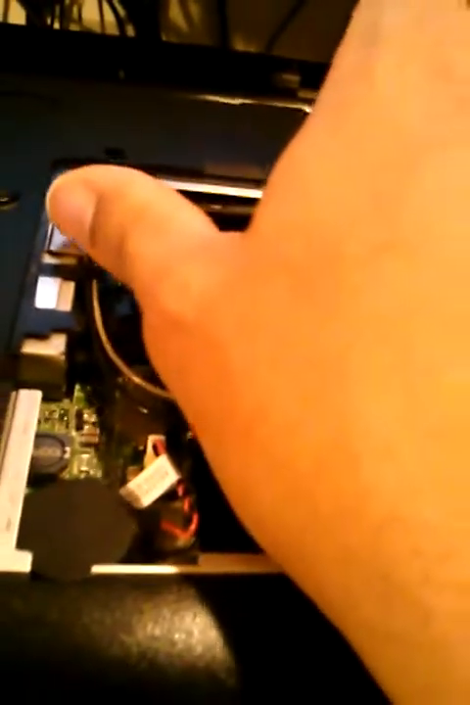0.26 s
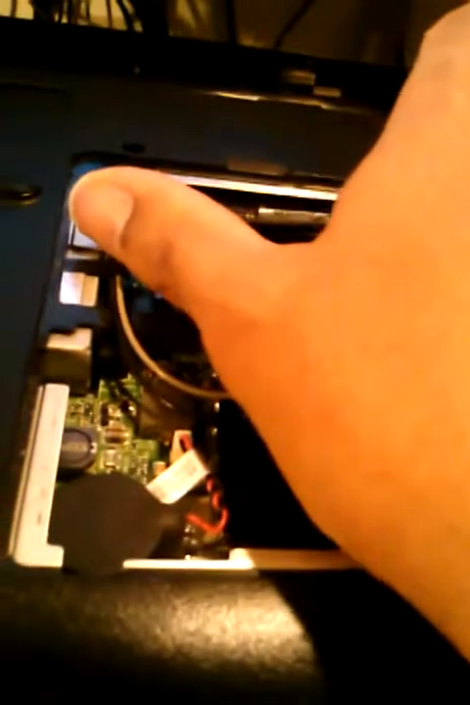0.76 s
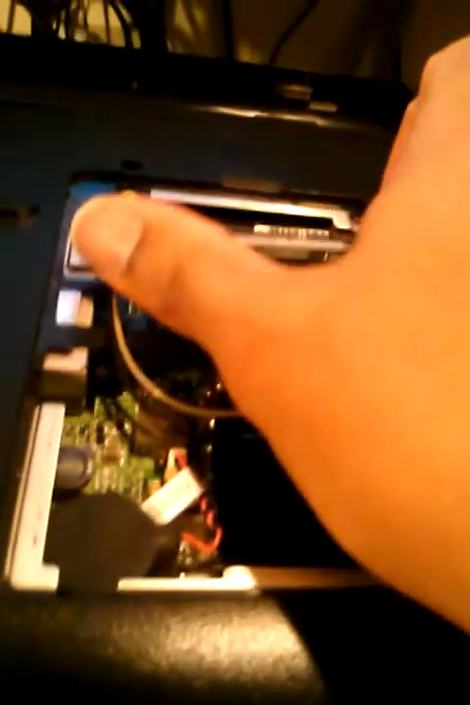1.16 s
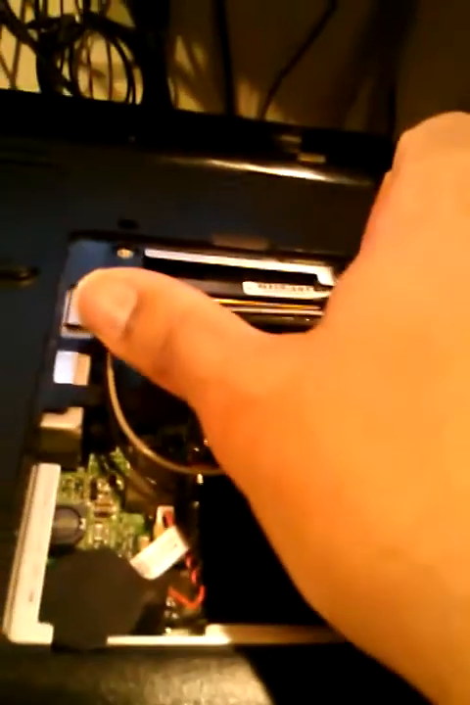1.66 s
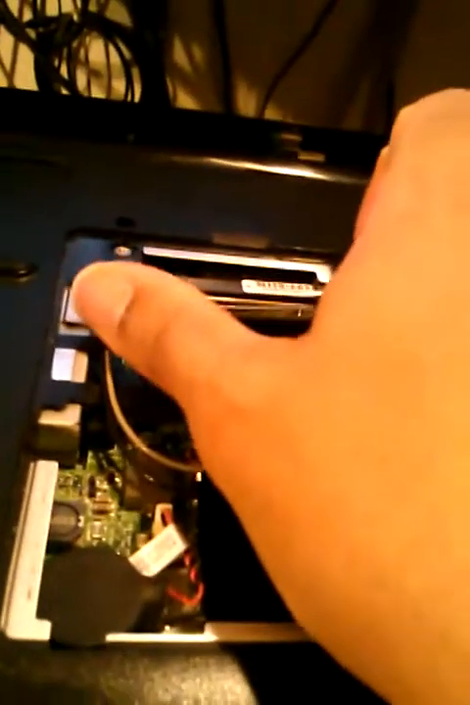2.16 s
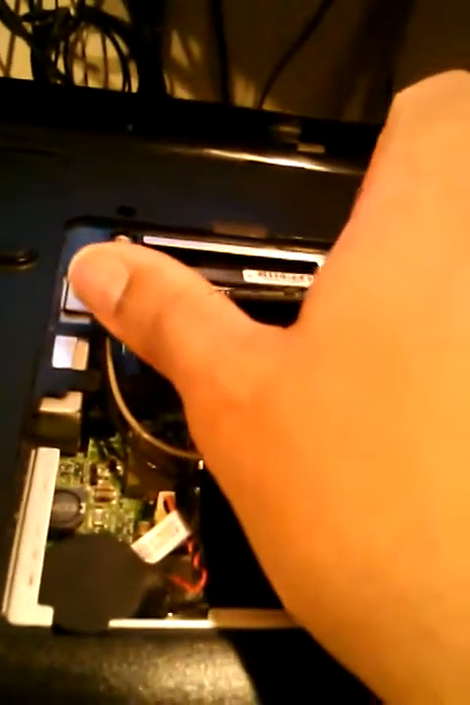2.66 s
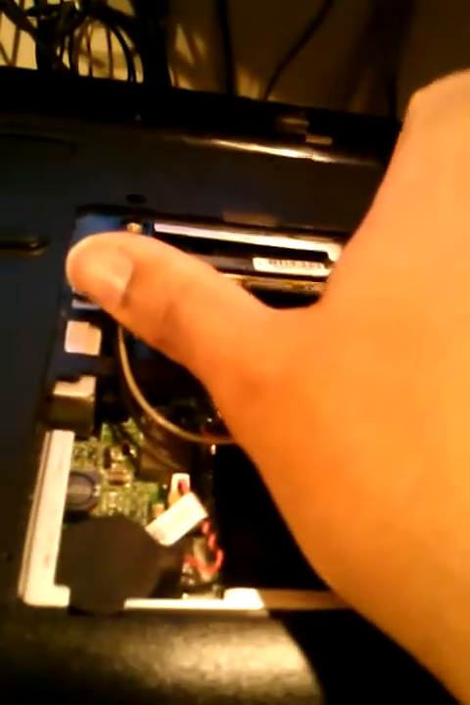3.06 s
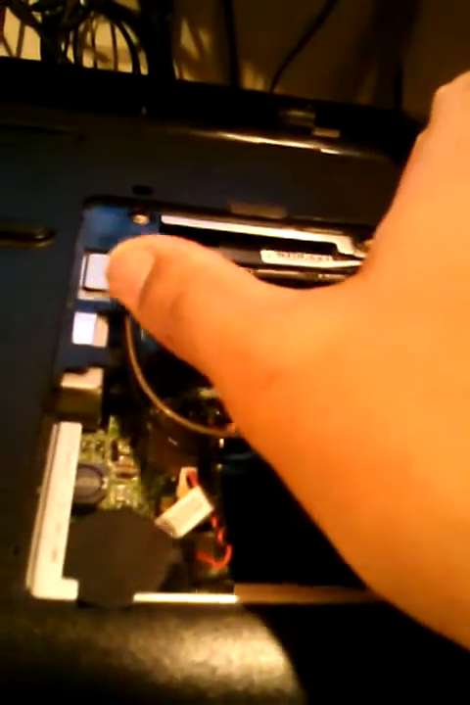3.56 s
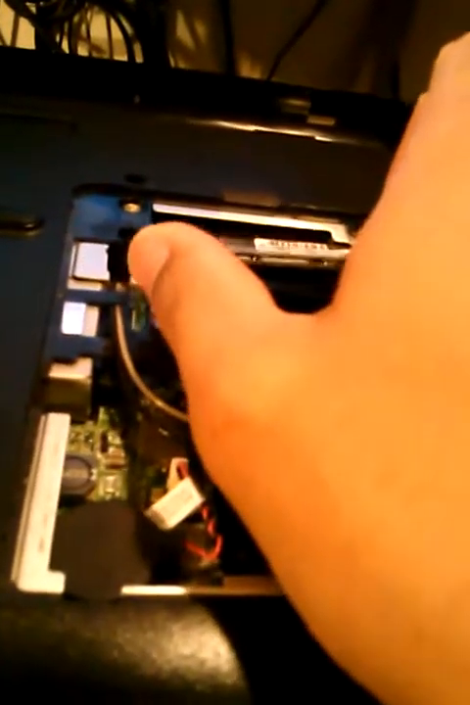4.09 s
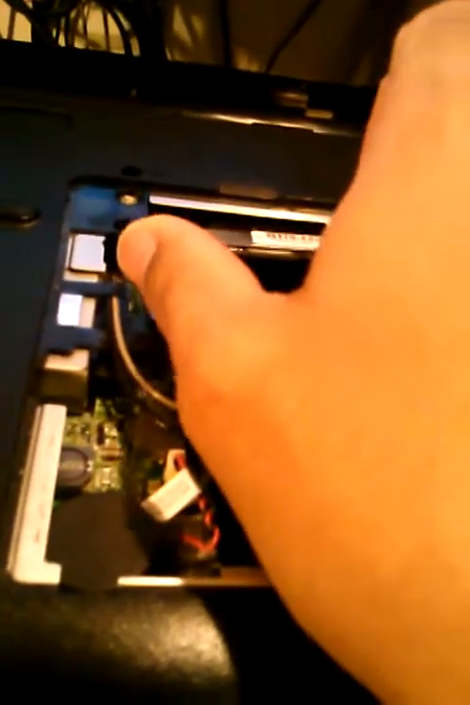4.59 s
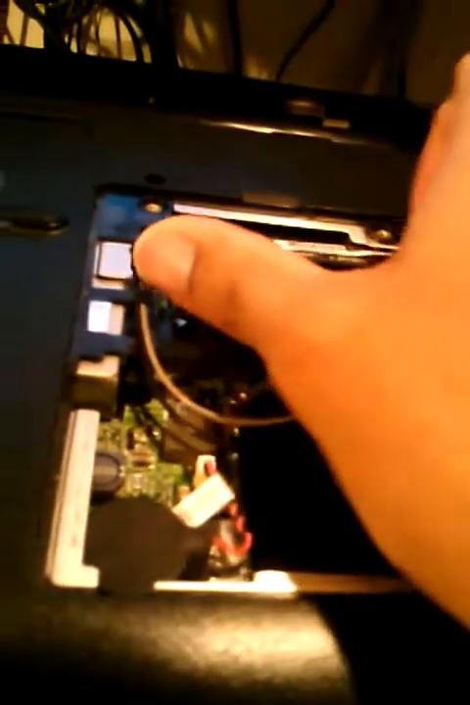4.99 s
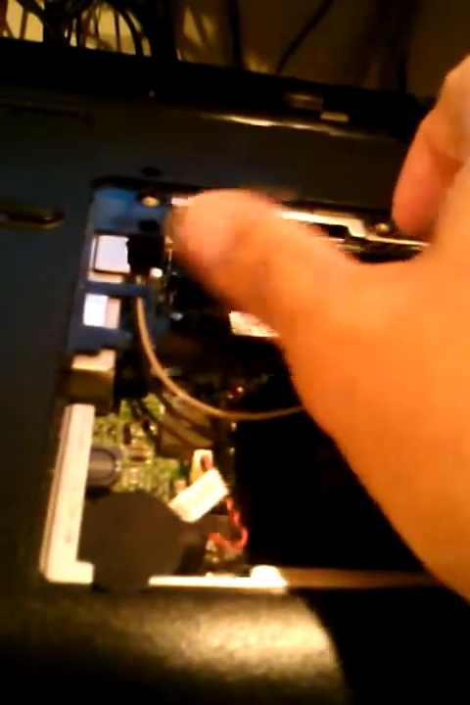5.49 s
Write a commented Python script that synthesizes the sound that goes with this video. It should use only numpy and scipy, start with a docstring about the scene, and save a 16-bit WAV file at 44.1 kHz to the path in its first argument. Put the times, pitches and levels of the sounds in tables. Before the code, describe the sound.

Sparse plastic clicks from a board handled in its slot, close to a handheld camera microphone. Low thuds near one second lead to sharper double ticks and short gritty scrapes, then a hard bright snap just after three seconds. Smaller taps and brief rubs continue to the end. Deep uneven handling rumble lies underneath, with quiet hiss that dips between movements and a short, small-room decay.

```python
"""A memory module is worked by fingers into its slot in an open laptop: impacts tick, stick and slip
scrapes, friction squeaks, and one snap with a rattle of rebounds seats the board. Impacts and scrapes
ring the modes of the plastic case and a small room. The hand-held camera rumbles with each shift of grip
and thuds when bumped; its noise suppressor ducks the steady hiss and wavering hum in the pauses."""
import sys
import numpy as np
from scipy import signal
from scipy.fft import rfft, irfft, next_fast_len
from scipy.io import wavfile
from scipy.ndimage import uniform_filter1d, map_coordinates

SR = 44100
rng = np.random.default_rng(int(sys.argv[2]) if len(sys.argv) > 2 else 0)


def generate_wav(sig):
    """Save sig (samples, or channels by samples) to the path in sys.argv[1] as 16-bit PCM at SR."""
    pcm = np.round(np.clip(np.atleast_2d(sig).T, -1, 1) * 32767).astype(np.int16)
    wavfile.write(sys.argv[1], SR, pcm)


N = 253134  # length in samples

# Background hiss spectrum. Each row: frequency in Hz, relative density in dB per Hz.
HISS_SPECTRUM = [(20, -3.5), (60, 2), (140, -2.5), (270, -6.5), (400, -11.5), (480, -9.5), (640, -15.5),
                 (970, -16), (1400, -22), (1900, -24.5), (3800, -28), (4600, -32), (9200, -27.5),
                 (11500, -29.5), (15500, -31)]
# Hum lines. Each row: frequency in Hz, level in dB relative to the hum level.
HUM_LINES = [(97, 4), (120, 4.5), (176, -1.5), (240, -2.5), (469, -6)]
# Noise suppressor: fully open above this level, dB closed per dB below it, deepest cut, reaction time.
OPEN_DB, CLOSING_SLOPE, DEPTH_DB, REACTION_S = -44, 0.6, 15.5, 0.0049

# Rumble of the camera body. Each row: frequency in Hz, relative density in dB per Hz.
RUMBLE_SPECTRUM = [(3, -23), (9, 5), (18, 3), (30, -8), (50, -16.5), (80, -25), (150, -36), (400, -59),
                   (1500, -110)]
# Separate shifts of the grip. Each row: start in seconds, length in seconds,
# rumble in dB before the layer gain.
GRIP_SHIFTS = [(0.035,0.027,-49), (0.21,0.048,-47.5), (0.288,0.05,-49), (0.387,0.083,-49), (0.525,0.06,-45),
               (0.721,0.024,-48.5), (0.814,0.22,-43.5), (1.136,0.043,-42.5), (1.331,.1,-43.5),
               (1.483,0.083,-42), (1.737,0.095,-43.5), (1.878,0.038,-41.5), (1.981,0.035,-44),
               (2.145,0.05,-47.5), (2.241,0.026,-44), (2.394,0.08,-42.5), (2.531,0.038,-44.5),
               (2.746,.07,-48.5), (2.824,0.067,-43.5), (3.057,.14,-39.5), (3.262,0.033,-40),
               (3.365,0.058,-39.5), (3.493,0.041,-51.5), (3.562,0.098,-36.5), (3.808,.16,-59.5),
               (4.286,0.24,-63), (4.478,0.17,-43), (4.672,0.17,-51), (4.854,0.042,-47.5), (5.017,0.59,-42),
               (5.619,0.09,-58)]
# Linear build-up time, decay time constant, and the tremble of the hand at rest before the layer gain.
GRIP_ATTACK_S, GRIP_RELEASE_S, RESTING_DB = 0.033, 0.014, -70.5

# Reverberation of the desk and room. Each row: frequency in Hz, time to decay by 60 dB in seconds.
ROOM_DECAY = [(200, 0.68), (900, 0.15), (2000, 0.2), (6000, 0.18), (14000, 0.14)]
# Modes of case, board and clips. Each row: frequency in Hz, relative strength in dB under a touch,
# relative strength in dB under the snap, time to decay by 60 dB in seconds before the damping limit.
CASE_MODES = [(477.7,-18,-19.5,0.042), (550.6,-6,-35,0.14), (770,-19.5,-2,.16), (845.5,-3,-1.5,0.091),
              (954,0,-6,0.12), (1043,3.5,2.5,.08), (1300,-6,-9,0.054), (1387,-5,-6.5,0.1),
              (1508,-10.5,-10.5,0.19), (1616,-5,-6,0.17), (1680,-5.5,-5.5,0.09), (1855,-19,-15,0.11),
              (2230,-23,-17,0.065), (2463,-10,-14,0.092), (2990,-21,-19.5,.08), (3780,-21.5,-18,0.14),
              (3980,-12.5,-14,0.096), (4610,-19,-14,0.11), (5180,-22,-21.5,0.059), (7050,-21,-19,.08),
              (10500,-29,-19.5,0.068)]
# The crowd of weaker modes between them. Each row: frequency in Hz, relative density in dB per Hz.
CASE_SPECTRUM = [(100,-18.5), (350,-18), (520,-14), (660,-21), (830,-1.5), (1100,-5), (1650,-2.5),
                 (1950,-17), (2450,-12), (2900,-18.5), (3900,-19), (4800,-21), (10000,-26.5), (15500,-52.5)]
# The same crowd under the snap, deep in the slot. Each row: frequency in Hz, relative density in dB per Hz.
SLOT_SPECTRUM = [(100,-35), (450,-22), (700,-23.5), (810,-3), (1080,0.5), (1250,-6), (1650,-2.5),
                 (2500,-10.5), (2850,-14.5), (3900,-14), (4800,-17), (6700,-18.5), (10400,-25),
                 (15500,-40.5)]

# Single contacts of the module. Each row: start in seconds, then the levels of case knock, board clack
# and sharp edge in dB before the layer gain.
CONTACTS = [(0.125,-57.5,-68.5,-82), (0.325,-49.5,-58.5,-81), (.411,-49,-74,-69), (0.4453,-38.5,-56,-56),
            (0.557,-63,-41,-51), (0.599,-57,-53,-64), (1.391,-32.5,-43.5,-49.5), (1.399,-37.5,-43,-56.5),
            (1.674,-39,-40.5,-41), (1.901,-58.5,-57.5,-67.5), (1.931,-69,-62,-65), (2.0389,-62,-60.5,-71),
            (2.147,-40,-52,-58), (2.1666,-40,-36.5,-38), (2.32,-55,-75,-76), (2.466,-55,-58,-62),
            (2.5643,-82,-46,-66.5), (2.678,-42,-57.5,-69), (2.741,-47,-54,-93), (2.8588,-52,-55.5,-91),
            (3.033,-37,-45,-50.5), (3.4247,-59,-89,-80.5), (3.513,-54,-78.5,-73.5),
            (3.8574,-59.5,-55.5,-71), (3.877,-58,-59,-69), (4.109,-57.5,-71,-83), (4.144,-62,-70,-84),
            (4.1993,-46,-49.5,-54.5), (4.301,-59.5,-83,-88), (4.435,-55,-80,-79), (4.5234,-36.5,-40.5,-63),
            (4.5835,-53,-60,-73), (4.802,-56,-56,-53.5), (4.8599,-37.5,-45.5,-57), (4.885,-40.5,-54,-55),
            (5.214,-45,-64,-51.5), (5.538,-43,-73,-66)]
# Rebound of every contact: delay, then what knock, clack and edge lose.
REBOUND_S, REBOUND_LOSS_DB = 0.011, (14, 8, 8.5)
# After-ring of a middling knock, level of that knock before the layer gain, extra dB of ring per dB of knock.
RING_DB, MIDDLING_KNOCK_DB, RING_GROWTH = -8, -46, 0.23

# The hand bumps the camera. Each row: start in seconds, frequency in Hz, length in seconds,
# level in dB before the layer gain.
CAMERA_BUMPS = [(0.221,103.4,0.053,-57), (0.795,45,0.065,-49.5), (0.887,41.6,0.025,-39.5),
                (0.949,32.2,0.08,-41.5), (1.339,30.2,0.042,-35.5), (1.34,76,0.021,-46),
                (2.151,106,0.061,-53.5)]
# The module drags along the slot. Each row: start in seconds, length in seconds, then the levels of
# case knock, board clack and sharp edge in dB before the layer gain.
DRAGS = [(0.411,0.036,-57,-71,-77), (0.549,0.0081,-56.5,-53,-51), (0.558,0.036,-51,-52,-60),
         (1.257,0.025,-70,-73,-77), (1.36,0.025,-61,-63,-64), (1.406,0.03,-53.5,-59,-65),
         (1.503,0.029,-57,-69,-72.5), (1.533,0.021,-51.5,-60.5,-67.5), (1.665,0.017,-66,-55,-60),
         (1.749,.07,-83,-71,-72), (2.15,0.016,-48,-50,-66), (3.021,0.012,-60,-63,-72),
         (3.85,0.046,-64.5,-69.5,-79), (4.1908,0.0056,-54,-57,-63.5), (4.782,0.018,-56.5,-70,-66),
         (4.856,0.017,-49.5,-51,-65), (5.204,0.014,-62,-58,-65), (5.513,0.035,-60.5,-80.5,-81)]
# Metal contacts squeak as they rub. Each row: start in seconds, resonance in Hz, length in seconds,
# level in dB before the layer gain.
RUBS = [(1.248,10000,0.057,-77), (1.341,10000,0.05,-67.5), (1.382,10200,0.039,-53.5),
        (1.896,5760,0.051,-67), (2.039,5600,0.0072,-65), (2.037,9900,0.0095,-69), (3.018,10000,0.038,-59),
        (3.84,10250,0.041,-75), (4.793,2370,0.023,-65), (4.8,3450,0.0086,-64.5), (4.859,2470,0.0077,-54.5),
        (4.853,3660,0.02,-64)]
# The module snaps home and rebounds in the clips. Each row: start in seconds, then the levels of
# case knock, board clack and sharp edge in dB.
SNAP_BLOWS = [(3.045,-23,-30,-31.5), (3.0469,-32,-35,-31.5), (3.0544,-30.5,-33.5,-38), (3.06,-34,-32,-37),
              (3.069,-34,-38,-42)]

TOP_HZ = 15800  # band limit of the camera


def amp(db):
    """Logarithmic level: decibels become an amplitude gain."""
    return 10 ** (np.asarray(db) / 20)


def unit(x):
    """Normalisation of power: scale to rms 1."""
    return x / np.sqrt(np.mean(x ** 2) + 1e-20)


def along(points, hz):
    """Interpolation on a logarithmic frequency axis through (Hz, value) points."""
    f, v = np.transpose(points)
    return np.interp(np.log(hz + 1), np.log(f + 1), v)


def wobble(rate):
    """Slow random modulation: a smooth curve through `rate` random knots a second."""
    knots = rng.standard_normal(int(N * rate / SR) + 4)
    return map_coordinates(knots, [np.arange(N) * rate / SR])


def filtered(x, response):
    """Linear filtering: multiply the spectrum by a gain that depends on frequency."""
    size = next_fast_len(len(x) + 4096)
    hz = np.fft.rfftfreq(size, 1 / SR)
    return irfft(rfft(x, size) * response(hz), size)[:len(x)]


def noise(spectrum, size):
    """Spectral shaping: white noise takes on the given colour at rms 1."""
    white = rng.standard_normal(size)
    return unit(filtered(white, lambda hz: amp(along(spectrum, hz))))


def add(track, s, sound):
    """Superposition: mix a sound in at time s."""
    start = max(round(s * SR), 0)
    track[start:start + len(sound)] += sound[:N - start]


def background(hiss_db=-58, hum_db=-69, waver=0.27, lumpy_db=3, lumpy_hz=400):
    """Stationary noise and phase modulation: steady hiss with a lumpy low part, and a wavering hum."""
    t = np.arange(N) / SR
    hum = np.zeros(N)
    for hz, db in HUM_LINES:
        phase = 2 * np.pi * hz * t + waver * wobble(41)
        hum += amp(db) * np.sqrt(2) * np.sin(phase)
    hiss = noise(HISS_SPECTRUM, size=N)
    low = filtered(hiss, lambda hz: 1 / (1 + (hz / lumpy_hz) ** 2))
    lumpy_low = low * amp(lumpy_db * wobble(60))
    return amp(hiss_db) * (hiss - low + lumpy_low) + amp(hum_db) * hum


def suppressor(sound):
    """Downward expansion: the background gain opens with the smoothed power of the sound, closes in pauses."""
    keep = np.exp(-1 / (REACTION_S * SR))
    power = signal.lfilter([1 - keep], [1, -keep], sound ** 2)
    level_db = 10 * np.log10(power + 1e-20)
    return amp(np.clip(CLOSING_SLOPE * (level_db - OPEN_DB), -DEPTH_DB, 0))


def pressure():
    """Force envelope of the hand: each shift builds up linearly and, past its length, relaxes exponentially."""
    t = np.arange(N) / SR
    total = np.full(N, amp(RESTING_DB))
    for s, length, db in GRIP_SHIFTS:
        build_up = np.clip((t - s) / GRIP_ATTACK_S, 0, 1)
        relaxing = np.exp(-np.maximum(t - s - length, 0) / GRIP_RELEASE_S)
        total += amp(db) * build_up * relaxing
    return total


def handling(gain_db=-2.0, evenness=0.96):
    """Structure-borne sound: the grip shifts on the camera body and pushes slow waves into the microphone."""
    waves = noise(RUMBLE_SPECTRUM, size=N)
    # the slow rumble waves are evened out in size before the pressure shapes them
    size = uniform_filter1d(np.abs(signal.hilbert(waves)), size=SR // 20)
    even_waves = unit(waves / size ** evenness)
    return amp(gain_db) * pressure() * even_waves


def room(spectrum, onset=0.006):
    """Reverberation: reflections build up quickly, then each frequency dies at its own speed."""
    t = np.arange(SR // 3) / SR
    bins, frames, z = signal.stft(noise(spectrum, size=len(t)), SR, nperseg=256)
    decay = amp(-60 * frames / along(ROOM_DECAY, bins)[:, None])
    tail = signal.istft(z * decay, SR)[1][:len(t)]
    return tail * (1 - np.exp(-t / onset))


def ringing(column, detune, scatter_db):
    """Modal vibration: a push excites damped modes; the spot touched sets their strengths and any small shift."""
    t = np.arange(SR // 3) / SR
    modes = np.transpose(CASE_MODES)[:, :, None]
    hz = modes[0] * (1 + detune * rng.standard_normal(modes[0].shape))
    strength_db = modes[column] + scatter_db * rng.standard_normal(hz.shape)
    # plastic under a hand never rings for long
    t60 = np.minimum(modes[-1], .18)
    cycles = hz * t + rng.random(hz.shape)
    return np.sum(amp(strength_db - 60 * t / t60) * np.sin(2 * np.pi * cycles), axis=0)


def touch(ring_db, blow_t60=0.04, modes_db=-9, room_db=-11):
    """Impact response of a light contact: a short dense blow, the ringing modes and the room."""
    t = np.arange(SR // 3) / SR
    rise = 1 - np.exp(-t / .0007)
    blow = noise(CASE_SPECTRUM, size=len(t)) * amp(-60 * t / blow_t60)
    modes = amp(modes_db) * ringing(column=1, detune=.008, scatter_db=6.5)
    after = modes + amp(room_db) * room(CASE_SPECTRUM)
    # a finger resting on the board damps what rings on
    return (blow + amp(ring_db) * after) * rise


def voiced(sound, levels_db, length, lead, knock_hz=1100, clack_low_hz=1550, clack_high_hz=1850, edge_hz=3000):
    """Band weighting: knock, clack and edge ranges get their levels over the first moments of a contact."""
    knock = lambda hz: along([(knock_hz, 1), (clack_low_hz, 0)], hz)
    edge = lambda hz: along([(clack_high_hz, 0), (edge_hz, 1)], hz)
    clack = lambda hz: 1 - knock(hz) - edge(hz)
    start = round(lead * SR)
    stop = start + round(length * SR)
    padded = np.pad(sound, (start, 0))
    total = np.zeros(len(padded))
    for db, band in zip(levels_db, (knock, clack, edge)):
        part = filtered(padded, band)
        total += amp(db) * part / np.std(part[start:stop])
    return total


def clicks(gain_db=-4.0):
    """Impact and rebound: each contact strikes again once, thinner; a firmer knock leaves more ringing."""
    track, lead, length = np.zeros(N), .002, .008  # lead and levelled length in s
    for s, *levels_db in CONTACTS:
        ring_db = RING_DB + RING_GROWTH * (levels_db[0] - MIDDLING_KNOCK_DB)
        rebound_db = np.subtract(levels_db, REBOUND_LOSS_DB)
        add(track, s - lead, voiced(touch(ring_db), levels_db, length, lead))
        add(track, s + REBOUND_S - lead, voiced(touch(ring_db), rebound_db, length, lead))
    return amp(gain_db) * track


def bumps(gain_db=-1):
    """Low-frequency transient: each soft knock on the camera body is a brief swelling sine swing."""
    track = np.zeros(N)
    for s, hz, length, db in CAMERA_BUMPS:
        t = np.arange(round(length * SR)) / SR
        swing = np.sin(2 * np.pi * hz * t) * np.hanning(len(t))
        add(track, s, amp(db) * unit(swing))
    return amp(gain_db) * track


def scrapes(gain_db=-1, ring_db=-5):
    """Stick and slip: a run of tiny uneven pushes, convolved with a touch, rings the same case."""
    track, lead = np.zeros(N), .002  # lead in s
    slip_rate, slip_spread_db = 260, 5  # mean slips a second, spread of their sizes in dB
    for s, length, *levels_db in DRAGS:
        gaps = rng.uniform(.3, 1.7, size=80)
        sizes_db = slip_spread_db * rng.standard_normal(size=80)
        times = (np.cumsum(gaps) - gaps[0]) / slip_rate
        within = times < length
        slips = np.bincount((times[within] * SR).astype(int), amp(sizes_db[within]))
        drag = signal.fftconvolve(slips, touch(ring_db, blow_t60=0.028))
        add(track, s - lead, voiced(drag, levels_db, length, lead))
    return amp(gain_db) * track


def squeaks(gain_db=-2):
    """Resonance under friction: rubbing noise briefly drives one resonance of a contact."""
    track, width = np.zeros(N), .055  # half width as a fraction of the resonance
    for s, pitch_hz, length, db in RUBS:
        resonance = lambda hz: 1 / (1 + ((hz / pitch_hz - 1) / width) ** 2)
        rub = filtered(rng.standard_normal(SR // 8), resonance)
        swell = np.sqrt(np.hanning(round(length * SR)))
        add(track, s, amp(db) * unit(rub[:len(swell)] * swell))
    return amp(gain_db) * track


def snap(blow_t60=0.015, modes_db=-22.5, room_db=-26):
    """Hard impact: the module jumps into its seat with a short blow and a quick rattle of rebounds."""
    track, lead, length = np.zeros(N), .002, .008  # lead and levelled length in s
    t = np.arange(SR // 3) / SR
    rise = 1 - np.exp(-t / .0004)
    for s, *levels_db in SNAP_BLOWS:
        blow = noise(SLOT_SPECTRUM, size=len(t)) * amp(-60 * t / blow_t60) * rise
        add(track, s - lead, voiced(blow, levels_db, length, lead))
    # the first blow sets the whole case and the room ringing
    modes = amp(modes_db) * ringing(column=2, detune=0, scatter_db=4.5)
    after = modes + amp(room_db) * room(SLOT_SPECTRUM)
    # the small case radiates little bass
    radiation = signal.butter(3, 600, "highpass", fs=SR, output="sos")
    add(track, SNAP_BLOWS[0][0], signal.sosfilt(radiation, after * rise))
    return track


def scene():
    """Superposition at one microphone; close sounds let the background through with them."""
    close = handling() + clicks() + bumps() + scrapes() + squeaks() + snap()
    return (close + suppressor(close) * background())[None]


def record(dry):
    """Band limitation: the camera keeps nothing above its upper limit."""
    return np.array([filtered(channel, lambda hz: hz < TOP_HZ) for channel in dry])


dry = scene()
out = record(dry)
generate_wav(out)
```